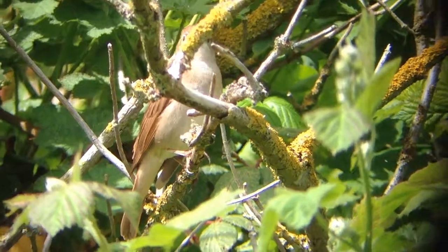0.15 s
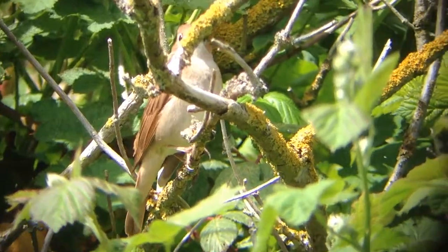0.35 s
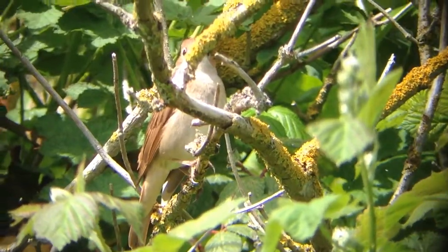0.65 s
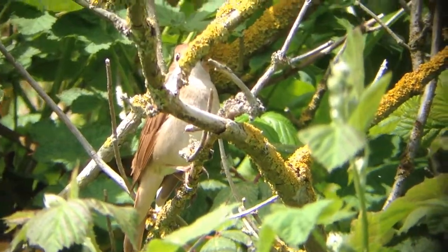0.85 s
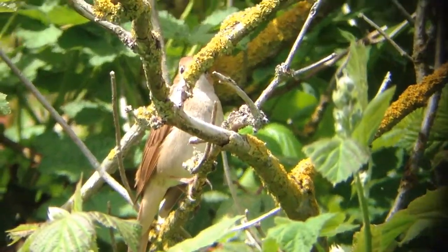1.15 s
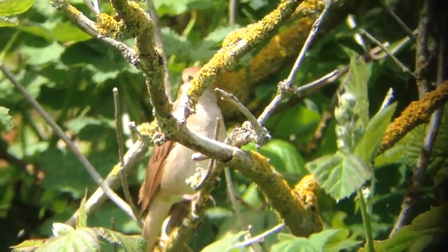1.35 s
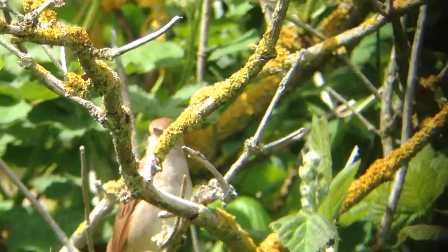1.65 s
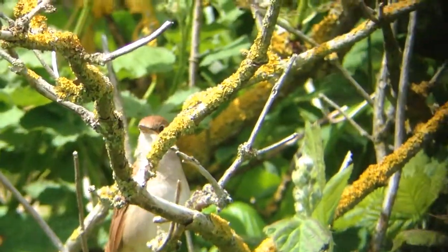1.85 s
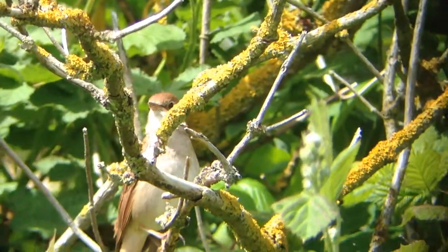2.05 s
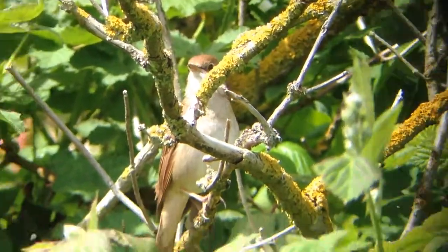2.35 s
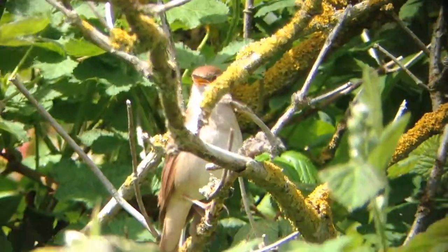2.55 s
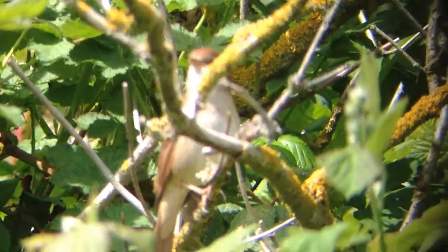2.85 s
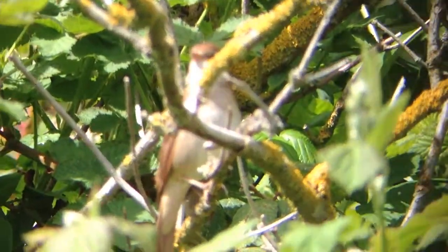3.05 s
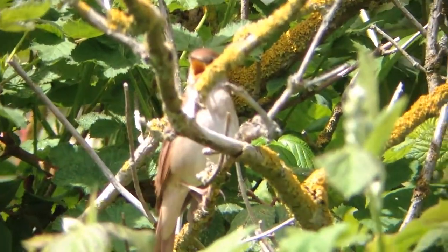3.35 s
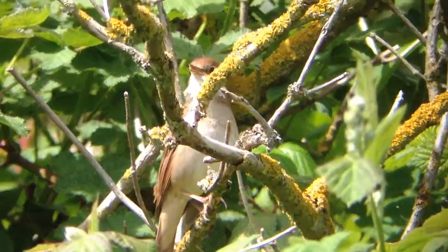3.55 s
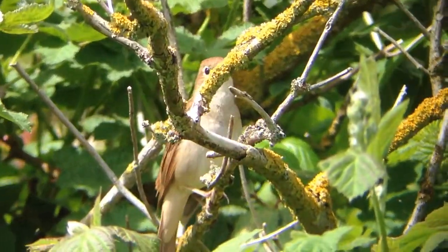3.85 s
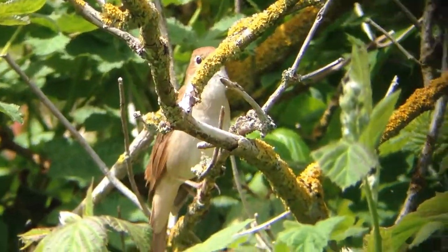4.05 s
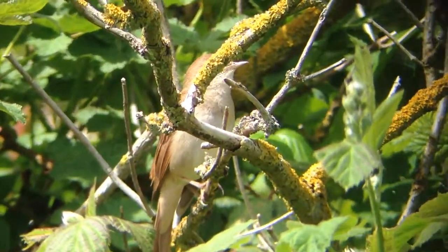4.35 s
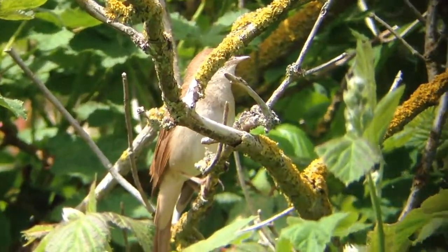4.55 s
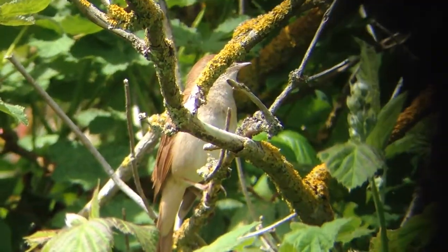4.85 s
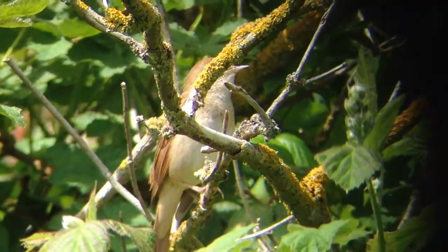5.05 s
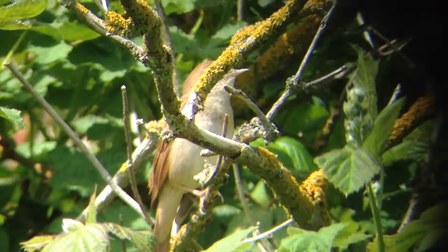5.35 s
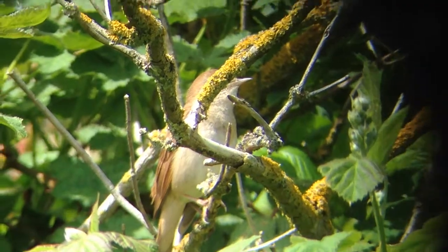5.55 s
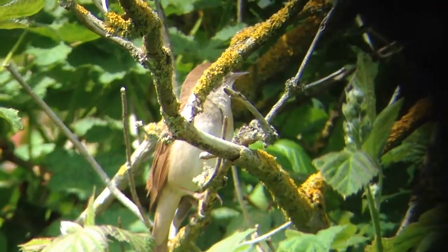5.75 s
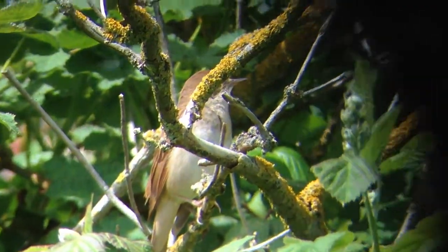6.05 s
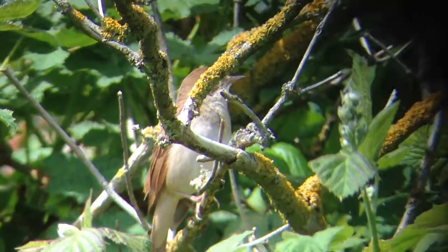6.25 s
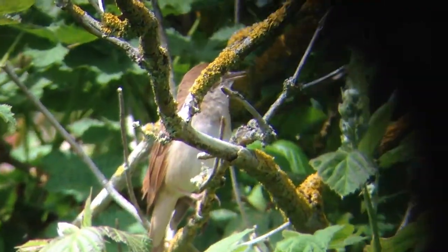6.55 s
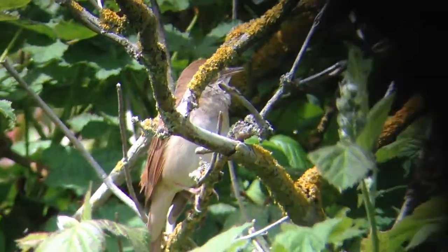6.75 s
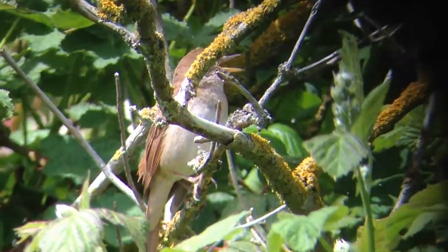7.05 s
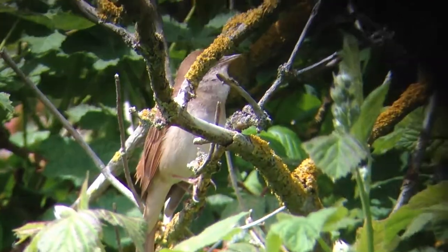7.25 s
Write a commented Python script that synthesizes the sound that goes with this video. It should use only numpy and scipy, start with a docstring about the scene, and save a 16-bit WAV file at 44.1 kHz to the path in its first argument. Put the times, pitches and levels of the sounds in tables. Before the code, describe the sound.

Faint birds warble far off in a leafy thicket, over a soft distant rumble, a low throbbing hum and light microphone hiss. After about two seconds a nearby nightingale sings one phrase: a short whistle, a soft rattle, buzzes, a low purr, four loud two-part clacks and a high flick. The notes echo briefly in the foliage. The far birds then carry on, with a few small twig ticks.

```python
"""Leafy thicket. A nightingale sings one phrase: whistle, soft rattle, buzzes, four loud two-part clacks,
high flick. Each side of its syrinx is a vibrating membrane giving a nearly pure tone.
Farther birds warble faintly before and after. Foliage scatters every note.
Behind: small rustles and twig ticks, distant rumble, low throbbing hum, microphone hiss."""
import sys
import numpy as np
from scipy import signal
from scipy.fft import rfft, irfft, next_fast_len
from scipy.io import wavfile
from scipy.ndimage import uniform_filter1d, map_coordinates

SR = 44100
rng = np.random.default_rng(int(sys.argv[2]) if len(sys.argv) > 2 else 0)


def unload_audio(sound):
    """Save the sound as a 16-bit wav file, at the path given as the first command line argument."""
    columns = np.transpose(np.atleast_2d(sound))
    # keep every value between -1 and 1, then stretch to whole-number steps
    steps = np.round(np.clip(columns, -1, 1) * 32767)
    wavfile.write(sys.argv[1], SR, steps.astype(np.int16))


N = 326340

# Near notes: (time [s], pitch [Hz], level [dB])
WHISTLE = [(2.604, 2740, -70), (2.627, 3680, -53), (2.632, 3977, -42), (2.648, 3860, -42.5),
           (2.660, 3580, -57), (2.685, 3470, -52), (2.705, 3460, -70)]  # arches, settles
UPSLUR = [(3.212, 1746, -53.5), (3.229, 2520, -35.5), (3.252, 2980, -45), (3.261, 3440, -51.5),
          (3.266, 2470, -36.5), (3.272, 1610, -47.5)]  # climbs, snaps down
# Clack halves, one per side of the syrinx: (time from onset [s], pitch [Hz], level [dB])
CLACK_HOOK = [(0, 4370, -51.5), (.003, 3980, -32.5), (.006, 3840, -30.5), (.009, 3490, -40.5),
              (.012, 3166, -41), (.016, 2630, -33.5), (.021, 2530, -31.5), (.027, 2625, -40),
              (.033, 2600, -44)]
CLACK_DROP = [(0, 3750, -46), (.003, 3303, -34.5), (.007, 3010, -35.5), (.012, 2510, -29.5),
              (.016, 2330, -35.5), (.019, 1957, -31), (.022, 1510, -52.5)]
# Clacks: (hook time [s], hook gain [dB], opening pitch [ratio], drop time [s], drop gain [dB])
CLACKS = [(3.799, 0.5, 0.98, 3.8325, -2), (3.910, 0, 0.98, 3.9445, -1), (4.022, 1, 1.1, 4.056, -1.5),
          (4.138, 0, 1.084, 4.1735, -4)]
# Flick, two voices rising twice:
# (time [s], length [s], start [Hz], middle [Hz], end [Hz], level [dB], overtone [dB])
FLICK = [(4.253, .014, 6700, 7380, 7750, -54.5, -6), (4.258, 0.01, 3650, 4540, 5904, -46, -28),
         (4.267, .02, 5870, 7630, 7850, -53, -9), (4.268, .018, 3620, 4720, 5900, -45, -30)]

# Far note shapes: (start pitch [ratio], end pitch [ratio], jitter [ratio])
ARCH = (.8, .72, 0.0053)
FALL = (1.2, .86, 0.034)
PIPE = (1.02, .93, .004)
CHIP = (.92, 1.05, 0.041)
# Far notes: (time [s], length [s], pitch [Hz], relative level [dB])
FAR_ARCHES = [(.455, 0.063, 3630, -71), (0.579, .12, 3760, -73), (1.095, 0.13, 3950, -67),
              (2.423, .065, 2140, -61), (4.69, 0.048, 3900, -66), (4.888, .055, 3770, -65.5),
              (6.369, 0.041, 3280, -60.5)]
FAR_FALLS = [(.745, 0.033, 3230, -63), (1.765, 0.032, 3650, -64), (1.878, 0.031, 3830, -59),
             (1.954, .05, 3600, -59.5), (6.71, .036, 3700, -60)]
FAR_PIPES = [(1.03, .07, 3180, -63.5), (2.436, 0.044, 3180, -60.5), (2.715, .065, 3330, -61),
             (2.964, 0.048, 2880, -63), (3.263, 0.046, 3150, -51), (3.285, 0.051, 4280, -62.5),
             (3.558, 0.039, 3350, -58), (3.596, .038, 3065, -59), (3.731, .068, 4230, -65.5),
             (7.191, 0.064, 3416, -59)]
# Far rising chips: (time [s], pitch [Hz], relative level [dB])
FAR_CHIPS = [(1.745, 4300, -61), (1.863, 4880, -65), (6.131, 5450, -65), (6.16, 5680, -63),
             (6.218, 5500, -62.5), (6.99, 2830, -58.5), (7.153, 2930, -59)]

# Thicket decay: (frequency [Hz], T60 [s])
THICKET_T60 = [(1000, 0.13), (3000, 0.25), (8000, 0.052)]
# Leaf reflection, weak for long waves: (frequency [Hz], gain [dB])
LEAF_SCATTER = [(1500, -1.5), (2800, 0.5), (4200, 0), (8000, 6.5)]
# Leaves brushing: (time [s], length [s], level [dB])
RUSTLES = [(0, 0.29, -63), (.285, 0.09, -58)]
# Twig ticks and bumps: (time [s], level [dB], centre [Hz], T60 [s])
TICKS = [(.002, -52.5, 3660, 0.094), (.316, -48.5, 2060, .08), (4.523, -52, 1970, 0.048),
         (5.574, -38.5, 720, 0.017), (6.379, -44, 90, 0.088), (6.401, -51, 700, .04),
         (6.672, -54, 2160, .06), (6.752, -49, 700, .035), (6.768, -50, 1100, .06)]

# Noise spectra: (frequency [Hz], relative density [dB])
LEAF_SPECTRUM = [(900, -24), (2000, 3), (3500, -2), (5500, -9), (8000, -34)]
RUMBLE_SPECTRUM = [(20, -14), (40, -4.5), (65, 1.5), (130, -2.5), (200, -7.5), (280, -20), (500, -36.5)]
RUSH_SPECTRUM = [(120, -12.5), (280, 0), (550, 0), (1000, -1.5), (1600, -5), (2500, -12), (4000, -18),
                 (7000, -28)]
HISS_SPECTRUM = [(500, -8.5), (4000, 1.5), (9000, -0.5), (15000, -1.5)]
# Distant noise, relative levels: (time [s], rumble [dB], rush [dB])
DISTANT_LEVELS = [(0.0, -57, -61), (0.62, -63, -63), (1.19, -59.5, -61.5), (2.16, -63, -62.5),
                  (3.83, -58.5, -63), (6.68, -58.5, -63), (7.4, -60.5, -62)]
# Hum lines: (order [x throb rate]) and (relative level [dB])
HUM_ORDERS = (3, 4, 5, 6, 7, 8, 10)
HUM_LINE_DB = [-71.5, -67, -64, -70, -65, -65, -75]
# Hum swell: (time [s], gain [dB])
HUM_SWELL = [(1.3, -6), (3.8, -1.5), (6.5, -1.5), (7.4, -5)]


def nightingale():
    """Near phrase: chuck, whistle, rattle, buzzes, upslur, clacks, flick."""
    song = buzzes()
    song += trill(2.812, spacing_s=.0248, length_s=.012, start_hz=2610, end_hz=1760,
                  first_db=-59, last_db=-56, jitter=.055)  # rattle
    add(song, 2.2, slur(.023, start_hz=2470, middle_hz=1940, end_hz=1800, db=-52, jitter=.05))  # chuck
    for points in (WHISTLE, UPSLUR):
        add(song, points[0][0], contour(points))
    for hook_s, hook_db, opening, drop_s, drop_db in CLACKS:
        add(song, hook_s, amp(hook_db) * contour(CLACK_HOOK, opening))
        add(song, drop_s, amp(drop_db) * contour(CLACK_DROP, opening, jitter=.014))
    for at_s, *shape in FLICK:
        add(song, at_s, slur(*shape, jitter=.023))
    flutter_db = 1.06 * wobble(300)
    return song * amp(flutter_db)


def syrinx(hz, gain, overtone_db=-48, jitter=.0039):
    """One vibrating membrane: near-pure tone, unsteady pitch."""
    phase = 2 * np.pi * np.cumsum(hz * (1 + jitter * wobble(502, len(hz)))) / SR
    edges = signal.windows.tukey(len(hz), min(1, SR / 500 / len(hz)))
    return np.sqrt(2) * gain * edges * (np.sin(phase) + amp(overtone_db) * np.sin(2 * phase))


def contour(points, opening=1, jitter=.0044):
    """Note along breakpoints; the opening pitch ratio relaxes to 1."""
    times_s, hz, db = np.transpose(points)
    times_s = np.sort(times_s)
    t = np.arange(times_s[0], times_s[-1], 1 / SR)
    tension = opening ** (np.linspace(1, 0, len(t)) ** 2)
    pitch_hz = uniform_filter1d(np.interp(t, times_s, hz), size=64) * tension
    return syrinx(pitch_hz, amp(np.interp(t, times_s, db)), jitter=jitter)


def slur(length_s, start_hz, middle_hz, end_hz, db, overtone_db=-48, jitter=.0058):
    """Note that swells and fades on a pitch arc."""
    u = np.linspace(0, 1, int(length_s * SR))
    hz = np.polyval(np.polyfit([0, .5, 1], [start_hz, middle_hz, end_hz], 2), u)
    return syrinx(hz, amp(db) * np.abs(np.sin(np.pi * u)) ** .5, overtone_db, jitter)


def trill(at_s, spacing_s, length_s, start_hz, end_hz, first_db, last_db, jitter, count=7):
    """Even run of downsweeps on a level ramp."""
    run = np.zeros(N)
    middle_hz = (start_hz + end_hz) / 2
    for k, db in enumerate(np.linspace(first_db, last_db, count)):
        add(run, at_s + k * spacing_s, slur(length_s, start_hz, middle_hz, end_hz, db, jitter=jitter))
    return run


def buzzes():
    """High rasp, five soft buzzes, low purr."""
    song = np.zeros(N)
    add(song, 3.069, rasp(.076, hz=4560, swing_hz=380, rate_hz=176, db=-50))
    for k in range(5):
        soft = buzz(.038, hz=4470, swing_hz=700, rate_hz=190, db=-58, upper_db=-9, dip_db=4.5, jitter=.06)
        add(song, 3.329 + k * .0487, soft)
    purr = buzz(.079, hz=1704, swing_hz=114, rate_hz=94, db=-36, upper_db=-45, dip_db=13, jitter=.022)
    add(song, 3.668, purr)
    return song


def rasp(length_s, hz, swing_hz, rate_hz, db, upper_db=-10, attack_s=.0054, fade_db=10, jitter=.049):
    """Both sides of the syrinx quiver fast; the upper one climbs."""
    t = np.arange(int(length_s * SR)) / SR
    u = t / length_s
    swing = np.sin(2 * np.pi * rate_hz * t)
    gain = amp(db - fade_db * u ** 2 + 1.5 * swing) * np.minimum(1, t / attack_s)
    pitch_hz = hz + swing_hz * swing
    upper = syrinx(pitch_hz * (1.09 + .25 * u), gain * amp(upper_db), jitter=jitter)
    return syrinx(pitch_hz, gain, jitter=jitter) + upper


def buzz(length_s, hz, swing_hz, rate_hz, db, upper_db, dip_db, jitter, upper_ratio=1.33, climb_hz=0):
    """Pitch and level swing together; the second side of the syrinx sings higher."""
    t = np.arange(int(length_s * SR)) / SR
    swing = -np.cos(2 * np.pi * rate_hz * t)
    gain = amp(db + dip_db * (swing - 1) / 2) * np.abs(np.sin(np.pi * t / length_s)) ** 1.4
    pitch_hz = hz + swing_hz * swing + climb_hz * (t / length_s - .5)
    lower = syrinx(pitch_hz, gain, jitter=jitter)
    return lower + syrinx(pitch_hz * upper_ratio, gain * amp(upper_db), jitter=jitter)


def far_birds():
    """Faint single notes and one phrase, level fluttering."""
    song = far_phrase()
    for shape, rows in ((ARCH, FAR_ARCHES), (FALL, FAR_FALLS), (PIPE, FAR_PIPES)):
        for at_s, length_s, hz, db in rows:
            add(song, at_s, far_note(shape, length_s, hz, db))
    for at_s, hz, db in FAR_CHIPS:
        add(song, at_s, far_note(CHIP, .022, hz, db))
    return song * amp(-3 + 3.05 * wobble(140))


def far_phrase():
    """Three-note figure three times, swoop, quavering climb, trill."""
    song = trill(5.733, spacing_s=.0555, length_s=.026, start_hz=4270, end_hz=2600,
                 first_db=-61.5, last_db=-61, jitter=.008)
    for k in range(3):
        at_s, db = 5.004 + k * .1445, -63 + k * 1.5
        add(song, at_s, far_note(ARCH, .04, hz=4130, db=db - 5.5))
        add(song, at_s + .03, far_note(PIPE, .023, hz=2840, db=db))
        add(song, at_s + .063, far_note(FALL, .0276, hz=3600, db=db + 1))
    add(song, 5.449, slur(.07, start_hz=4900, middle_hz=3250, end_hz=2560, db=-58, jitter=.015))
    quaver = buzz(.16, hz=3070, swing_hz=130, rate_hz=53, db=-59, upper_db=-16, dip_db=5,
                  jitter=.027, upper_ratio=1.3, climb_hz=807)
    add(song, 5.53, quaver * amp(np.linspace(-4, 5, len(quaver))))
    return song


def far_note(shape, length_s, hz, db):
    """Shaped slur, passing hz at its middle."""
    start, end, jitter = shape
    return slur(length_s, hz * start, hz, hz * end, db, jitter=jitter)


def farthest_birds(db=-71, centre_hz=3200, typical_s=.04, count=160):
    """The four note shapes at random times and pitches."""
    song, shapes = np.zeros(N), (ARCH, FALL, PIPE, CHIP)
    for k, (shift, loudness, pitch, stretch) in enumerate(rng.standard_normal((count, 4))):
        at_s = (k + .5 + shift) / count * N / SR
        length_s = typical_s * np.exp(.3 * stretch)
        hz = centre_hz * np.exp(.16 * pitch)
        add(song, at_s, far_note(shapes[k % len(shapes)], length_s, hz, db + 2 * loudness))
    return song


def foliage(x, leaves_db, trees_db, leaves_t60_s=.092, trees_t60_s=1.0):
    """Scatter: near leaves die first, then the thicket, then distant trees."""
    hz, frame_s, bins = signal.stft(rng.standard_normal(SR), SR, nperseg=256)
    decay = amp(-60 * frame_s / along(THICKET_T60, hz)[:, None])
    thicket = signal.istft(bins * decay, SR, nperseg=256)[1][:SR]
    t = np.arange(SR) / SR
    leaves = rng.standard_normal(SR) * amp(-60 * t / leaves_t60_s)
    trees = rng.standard_normal(SR) * amp(-60 * t / trees_t60_s)
    parts = ((0, thicket), (leaves_db, leaves), (trees_db, trees))
    impulse = sum(amp(db) * part / np.linalg.norm(part) for db, part in parts)
    impulse *= 1 - np.exp(-t / .00033)
    return filtered(signal.fftconvolve(x, impulse)[:N], lambda hz: amp(along(LEAF_SCATTER, hz)))


def leaf_rustles():
    """Leaves brush together in brief swells."""
    envelope = np.zeros(N)
    for at_s, length_s, db in RUSTLES:
        add(envelope, at_s, amp(db) * signal.windows.tukey(int(length_s * SR), .7))
    return envelope * unit(noise(LEAF_SPECTRUM) * amp(2.7 * wobble(111)))


def twig_ticks(attack_s=.00026):
    """Short, half-noisy rings of wood."""
    ticks = np.zeros(N)
    t = np.arange(SR // 8) / SR
    for at_s, db, centre_hz, t60_s in TICKS:
        band = lambda hz: (1 + (hz / centre_hz - centre_hz / (hz + 1)) ** 2) ** -1.2
        grit = unit(filtered(rng.standard_normal(len(t)), band))
        ring = np.sin(2 * np.pi * centre_hz * t) + .78 * grit
        add(ticks, at_s, amp(db - 60 * t / t60_s) * (1 - np.exp(-t / attack_s)) * ring)
    return ticks


def distant_rumble():
    """Low rumble and broader rush, levels drifting."""
    rumble_db, rush_db = curves(DISTANT_LEVELS)
    rumble = amp(rumble_db - 1 + 1.2 * wobble(7)) * noise(RUMBLE_SPECTRUM)
    rush = amp(rush_db + 1.5 + .56 * wobble(9)) * noise(RUSH_SPECTRUM)
    return rumble + rush


def hum(throb_hz=20.07):
    """Harmonic lines throb together at their spacing."""
    turns = np.cumsum(throb_hz * (1 + .002 * wobble(1.97))) / SR
    lines = sum(amp(db + 1.17 * wobble(2.93)) * np.sin(2 * np.pi * order * turns + .5 * wobble(2.02))
                for order, db in zip(HUM_ORDERS, HUM_LINE_DB))
    return np.sqrt(2) * amp(curves(HUM_SWELL)[0]) * lines


def microphone_hiss(db=-71):
    """Steady self-noise."""
    return amp(db) * noise(HISS_SPECTRUM)


def amp(db):
    """dB to gain."""
    return 10 ** (np.asarray(db) / 20)


def unit(x):
    """Scale to rms 1."""
    return x / np.sqrt(np.mean(x ** 2) + 1e-20)


def along(points, hz):
    """Interpolate on a log frequency axis."""
    knots_hz, values = np.transpose(points)
    return np.interp(np.log(hz + 1), np.log(knots_hz + 1), values)


def curves(rows):
    """Per-sample curve for each column after time."""
    times_s, *columns = np.transpose(rows)
    return [np.interp(np.arange(N) / SR, times_s, column) for column in columns]


def wobble(rate_hz, size=N):
    """Smooth random curve, knots at rate_hz."""
    knots = rng.standard_normal(int(size * rate_hz / SR) + 4)
    return map_coordinates(knots, [np.arange(size) * rate_hz / SR])


def filtered(x, response):
    """Apply a frequency response."""
    size = next_fast_len(len(x) + SR // 4)
    return irfft(rfft(x, size) * response(np.fft.rfftfreq(size, 1 / SR)), size)[:len(x)]


def noise(spectrum):
    """Coloured noise, rms 1."""
    return unit(filtered(rng.standard_normal(N), lambda hz: amp(along(spectrum, hz))))


def add(track, at_s, sound):
    """Mix in at at_s."""
    start = int(np.clip(round(at_s * SR), 0, N - 1))
    track[start:start + len(sound)] += sound[:N - start]


def scene():
    """Mono mix; the farther the bird, the larger its share of echo."""
    near, far, farthest = nightingale(), far_birds(), farthest_birds()
    near_echo = amp(-12.5) * foliage(near, leaves_db=0, trees_db=-8.5)
    far_echo = amp(-8.5) * foliage(far + farthest, leaves_db=-5.5, trees_db=-7.5)
    birds = near + near_echo + far + far_echo + amp(-8.5) * farthest
    background = leaf_rustles() + twig_ticks() + distant_rumble() + hum() + microphone_hiss()
    return (birds + background)[None]


def record(dry):
    """Brick-wall band limit."""
    top_hz = 15450
    return filtered(dry[0], lambda hz: hz < top_hz)[None]


dry = scene()
out = record(dry)
unload_audio(out)
```